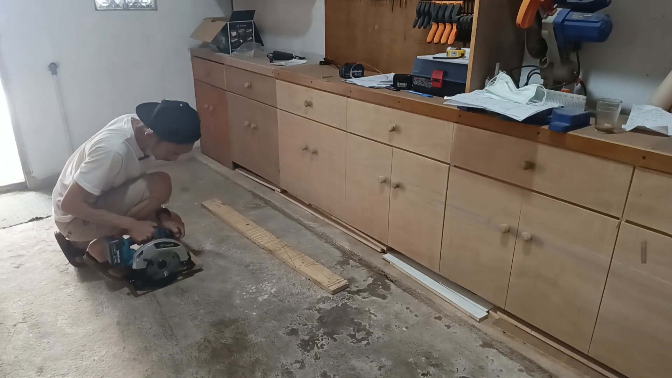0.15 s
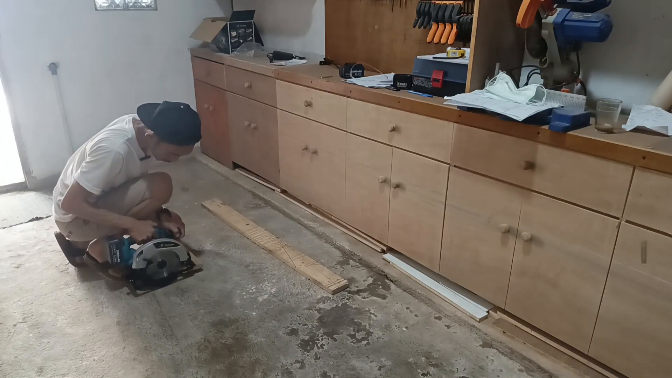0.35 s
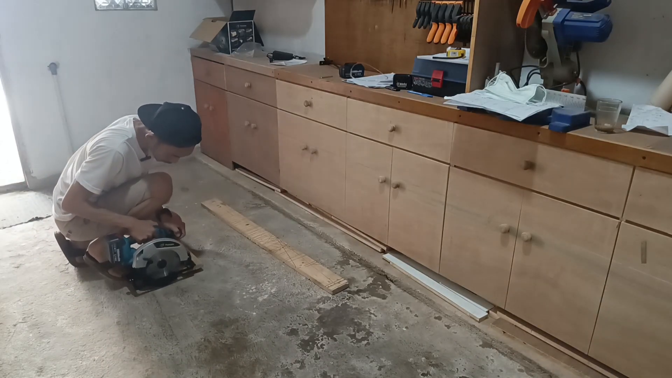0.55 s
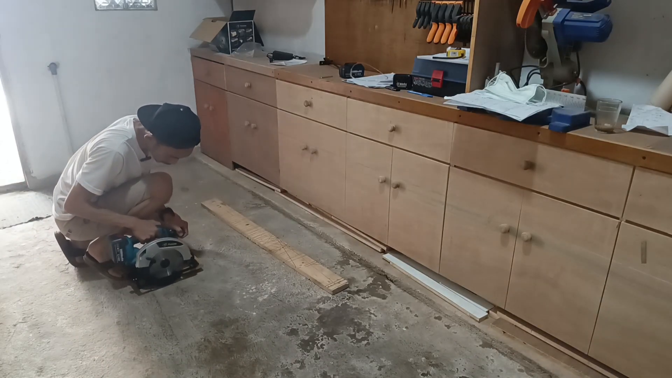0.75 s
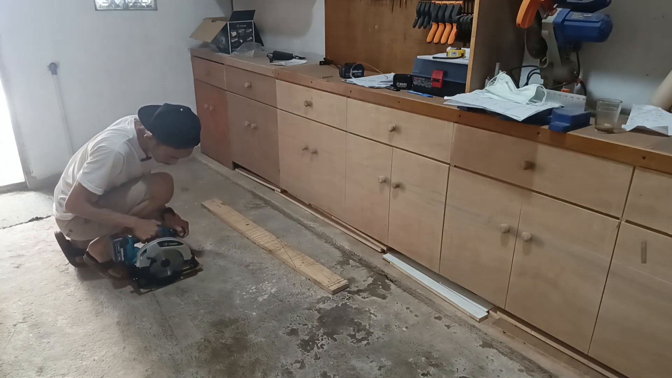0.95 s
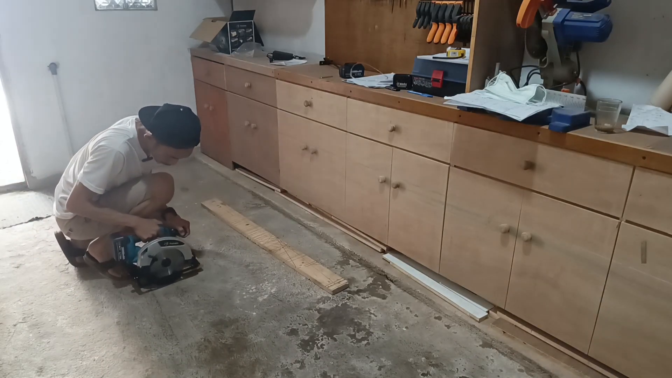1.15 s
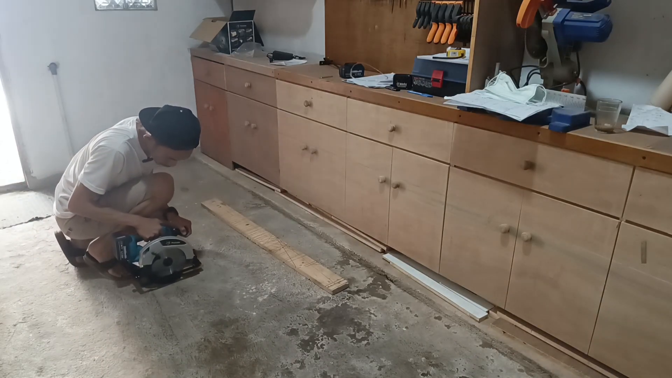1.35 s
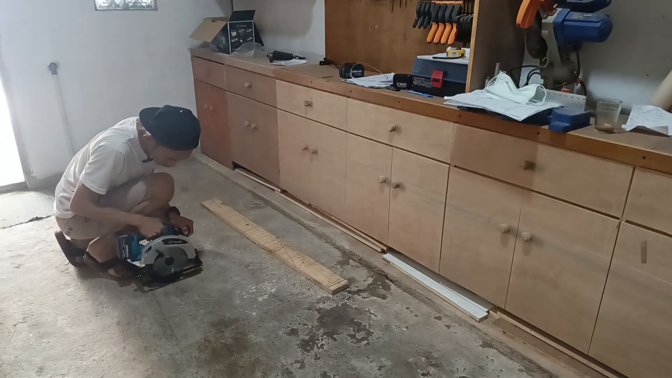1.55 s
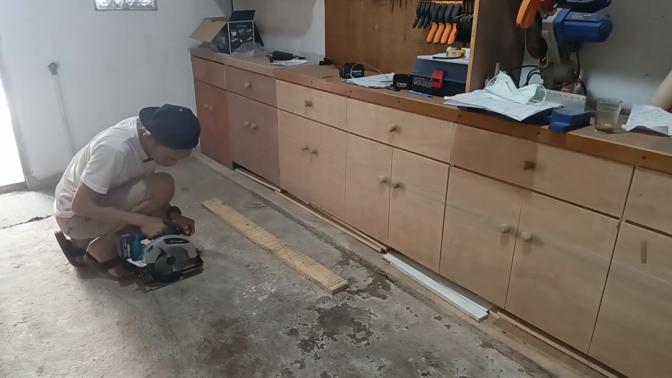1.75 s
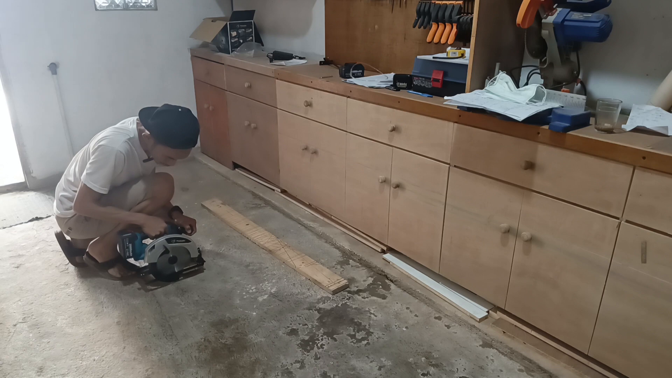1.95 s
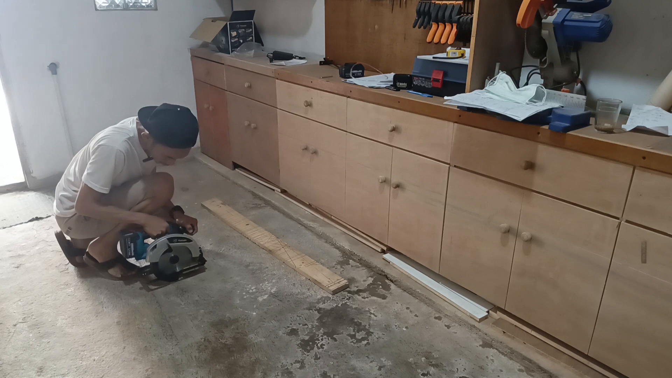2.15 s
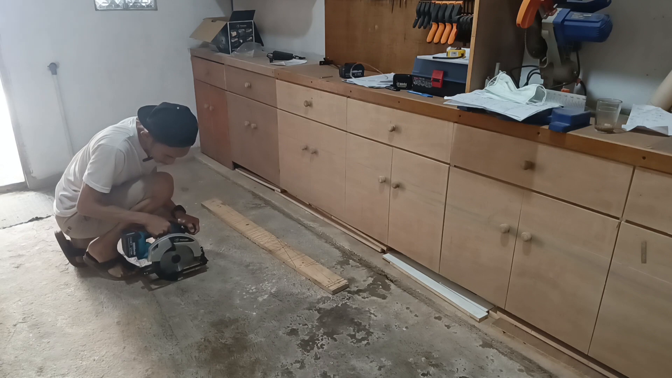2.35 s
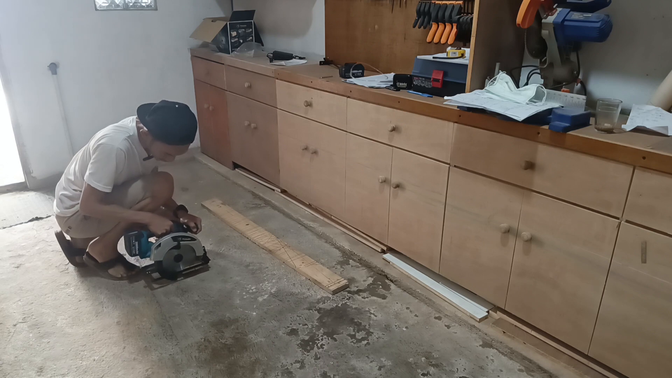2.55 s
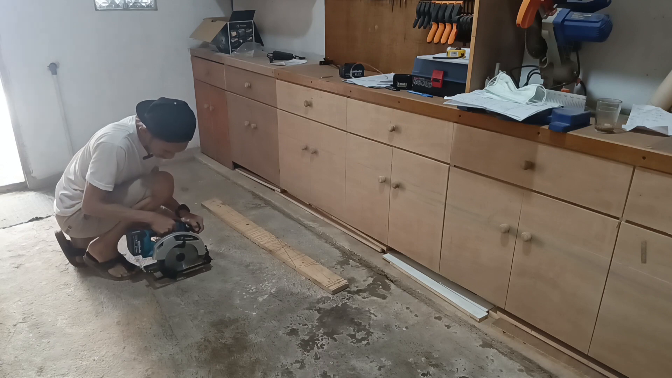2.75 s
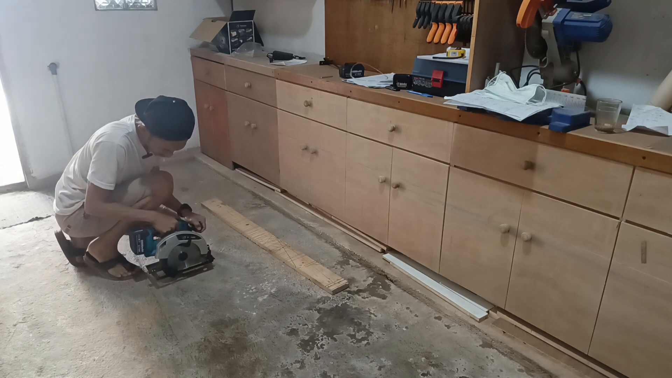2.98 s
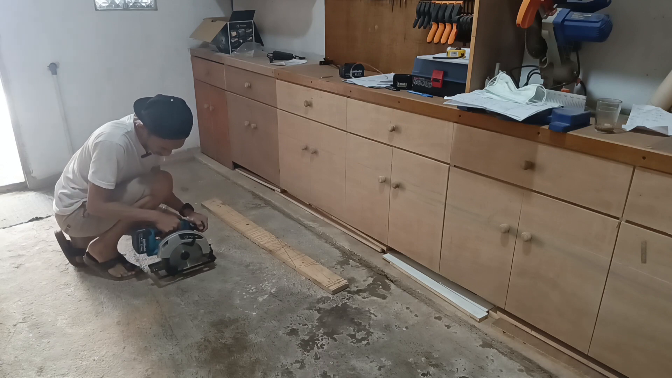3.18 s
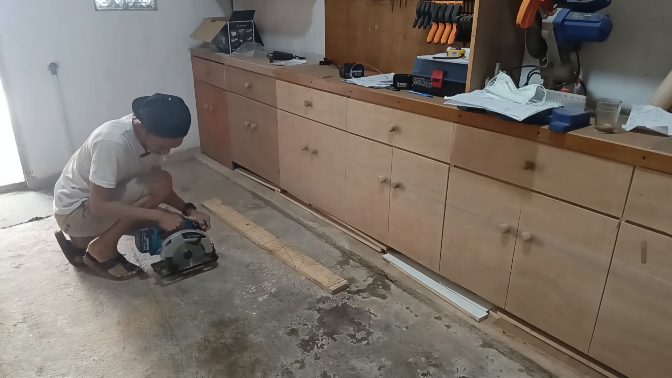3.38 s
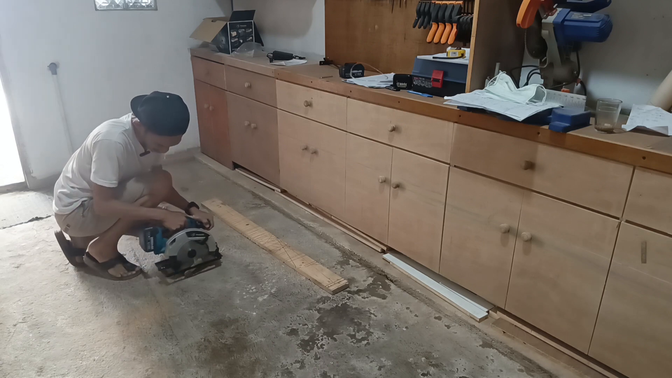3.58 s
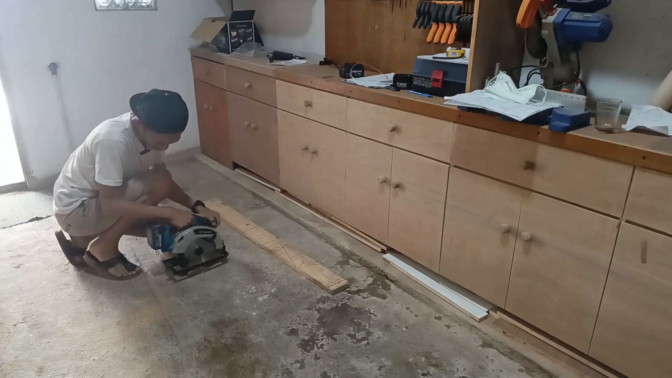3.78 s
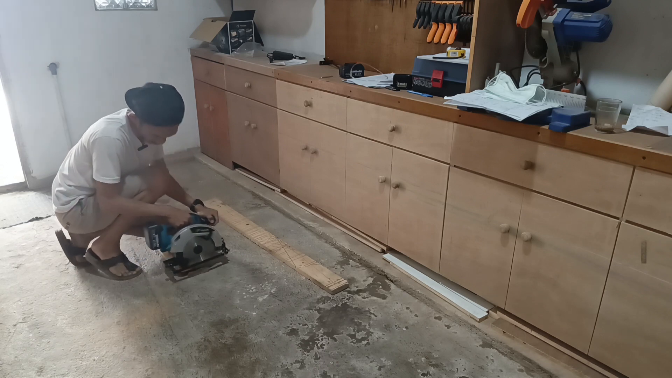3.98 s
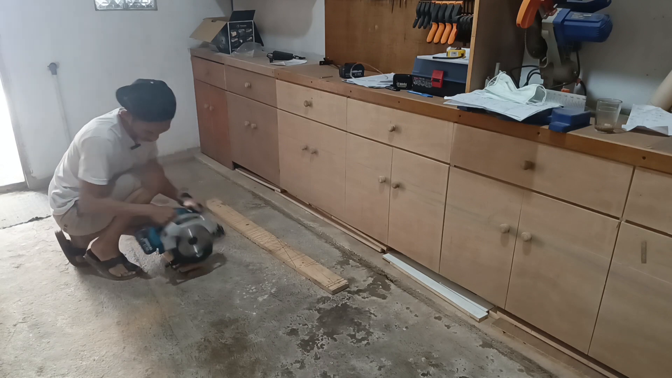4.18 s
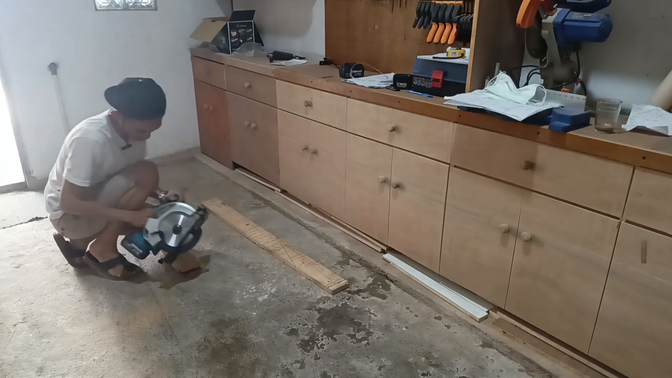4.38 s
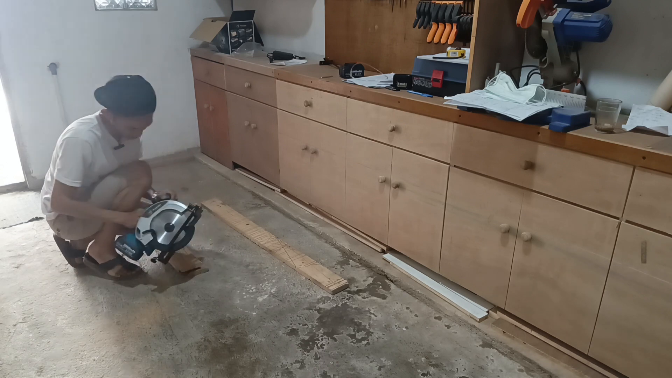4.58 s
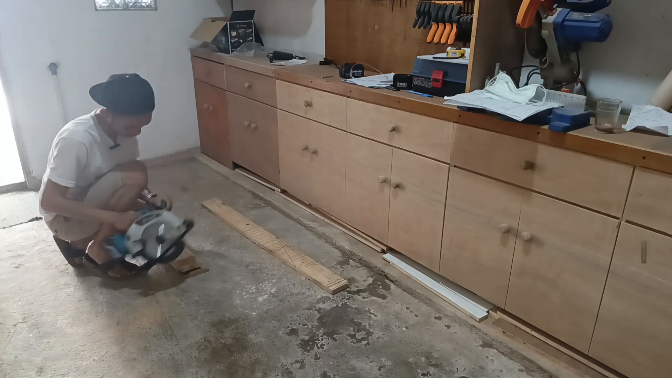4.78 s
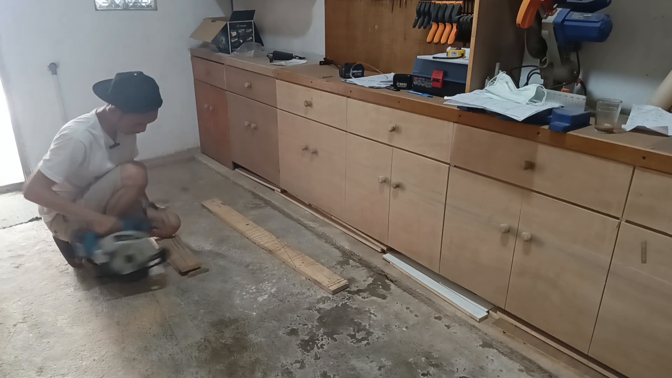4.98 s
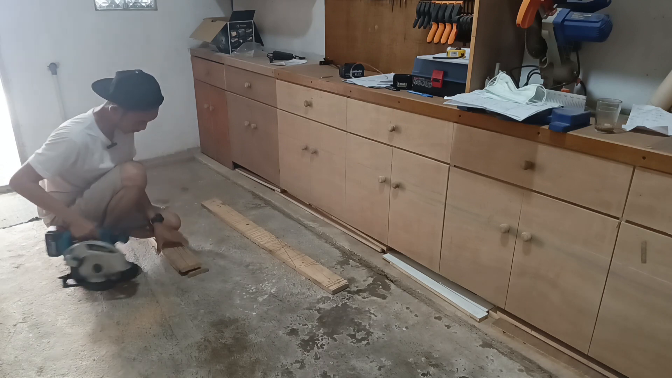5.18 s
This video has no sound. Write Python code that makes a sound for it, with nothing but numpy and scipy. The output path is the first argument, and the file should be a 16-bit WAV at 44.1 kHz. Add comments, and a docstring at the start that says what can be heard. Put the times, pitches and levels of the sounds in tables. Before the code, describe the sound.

A quiet workshop with a barely audible knock, then a sharp trigger click and a circular saw spinning up in half a second. The teeth bite with bright hiss and tearing, the pitch sagging under load, with howls and squeals near the end. The blade breaks free, power stops, and the gears rattle down past a dull guard clack. Close, clear, practically mono pickup with short hard-room reflections.

```python
"""A quiet workshop and a faint knock, then a trigger clicks and a cordless circular saw spins up. It rips
through a board and coasts down. The shaft speed drives gear whine, fan rush and the beat of the teeth. The cut
adds noise for hiss, tearing and splinters, and resonances for howls and zings. Squeals mark the blade rubbing,
and once in the run-down the slowing tooth tone sings through the blade's mode; ringing knocks the guard; slack
gears rattle beside the ringing blade."""
import sys
import numpy as np
from scipy import signal
from scipy.fft import rfft, irfft, next_fast_len
from scipy.io import wavfile
from scipy.ndimage import uniform_filter1d

SR = 44100
rng = np.random.default_rng(int(sys.argv[2]) if len(sys.argv) > 2 else 0)


def bounce(signal):
    """Save signal as a 16-bit WAV file at the path given by the first command-line argument."""
    frames = np.transpose(np.atleast_2d(signal))
    limited = np.clip(frames, -1, 1)
    pcm = np.round(limited * 32767).astype(np.int16)
    wavfile.write(sys.argv[1], SR, pcm)


N = 230731
T = np.arange(N) / SR  # time of every sample (s)

START, RELEASE = .426, 4.075  # trigger pulled and let go (s)
CUT_IN, CUT_OUT = .96, 3.77  # the teeth meet and leave the board (s)
PINION, TEETH_PER_TURN = 7, 4.41  # gear teeth and saw teeth passing per turn of the shaft
SPIN_UP_HZ_PER_S, FREE_HZ = 610, 314  # rise of the shaft speed, and its limit without load

# level of the whole gearbox: (start_s, level_db)
GEAR_LEVEL = [(.92, -1), (1.25, -7), (1.6, -8.5), (2.3, -11), (2.7, -27.5), (3.83, -13), (4.04, -16.5),
              (5.1, -23.5), (5.23, -27.5)]
# spectrum of the blade's draught: (pitch_hz, level_db)
DRAUGHT = [(12, -51), (20, 0), (70, 2.5), (403, -3), (467, -8), (500, -20.5), (650, -39), (1100, -120)]


def amp(db):
    """Turns decibels into a gain."""
    return 10 ** (np.asarray(db) / 20)


def evened(x):
    """Scales a sound to an rms of 1."""
    return x / np.sqrt(np.mean(x ** 2) + 1e-20)


def curve(rows):
    """Joins (s, value) points by straight lines."""
    return np.interp(T, *np.transpose(rows))


def between(start, end, rise, fall):
    """1 from start to end, with straight ramps after the start and after the end."""
    fade_in = np.clip((T - start) / rise, 0, 1)
    fade_out = np.clip(1 - (T - end) / fall, 0, 1)
    return fade_in * fade_out


def add(mix, s, sound):
    """Mixes a sound in at s seconds."""
    part = mix[round(s * SR):][:len(sound)]
    part += sound[:len(part)]


def noise():
    """White noise for the whole scene."""
    return rng.standard_normal(N)


def cycle(turns):
    """A sine wave that counts its position in whole turns."""
    return np.sin(2 * np.pi * turns)


def wander(hz):
    """Slow random drift with an rms of 1, mostly below the given rate."""
    size = next_fast_len(N, True)
    low_pass = 1 + (np.fft.rfftfreq(size, 1 / SR) / hz) ** 4
    return evened(irfft(rfft(noise(), size) / low_pass, size)[:N])


def colour(x, points):
    """Filters a sound to the given spectrum, without sounding ahead of its cause."""
    f, db = np.transpose(points)
    hz = abs(np.fft.fftfreq(4096, 1 / SR))
    level_db = np.interp(np.log(hz + 1), np.log(f + 1), db)
    log_gain = np.log(amp(np.maximum(level_db, -100)))
    # the Hilbert transform supplies the phase that makes the filter causal
    taps = np.fft.ifft(np.exp(np.conj(signal.hilbert(log_gain)))).real
    return signal.oaconvolve(x, taps[:len(taps) // 2])[:N]


def band(x, lo_hz, hi_hz):
    """Keeps the sound between two frequencies."""
    edges = [lo_hz, min(hi_hz, .49 * SR)]
    return signal.sosfilt(signal.butter(4, edges, "band", fs=SR, output="sos"), x)


def resonate(x, hz, width):
    """A resonance of gain 1 whose pitch can follow a curve."""
    turn = np.exp(2j * np.pi * np.cumsum(hz * np.ones(len(x))) / SR)
    r = np.exp(-np.pi * width / SR)
    # shift the pitch down to zero, smooth, then shift back up
    return 2 * (turn * signal.lfilter([1 - r], [1, -r], x / turn + 1e-18)).real


def twice_resonated(x, hz, width, second_width):
    """Two resonances in a row at the same pitch."""
    return resonate(resonate(x, hz, width), hz, second_width)


def ringing(x, modes):
    """Sum of fixed resonances, given as (pitch_hz, width_hz, level_db)."""
    return sum(amp(db) * signal.lfilter(*signal.iirpeak(min(hz, .49 * SR), hz / width, SR), x)
               for hz, width, db in modes)


def steadied(x, size=2205):
    """Holds the short-term level near 1, averaging twice over size samples."""
    power = uniform_filter1d(uniform_filter1d(x ** 2, size), size)
    return x / np.sqrt(abs(power) + 1e-14)


def room(x, wet_db=-7, t60=.26, dull_hz=9000):
    """Floor and cabinet reflections and the workshop's tail: sparse random echoes that die away."""
    t = np.arange(SR // 2) / SR
    signs = rng.choice([-1., 1.], len(t))
    sparse = rng.random(len(t)) < 2000 / SR  # about 2000 echoes per second
    taps = signs * sparse * amp(-60 * t / t60) * (t > .004)
    taps = signal.lfilter(*signal.butter(1, min(dull_hz, .45 * SR), fs=SR), taps)
    echoes = signal.oaconvolve(x, taps / np.linalg.norm(taps))[:N]
    return evened(x + amp(wet_db) * echoes) * np.std(x)


def workshop_tone():
    """The steady, quiet noise of the workshop: white noise shaped to the room's spectrum."""
    # spectrum of the quiet workshop: (pitch_hz, level_db)
    room_spectrum = [(15, -27), (25, 9), (27, -7), (146, -11), (326, -14), (363, -3), (501, -6), (573, -9),
                     (749, -11), (1150, -14), (2370, -25), (7280, -32.5), (11500, -33), (15000, -36)]
    tone_db = -73.5
    return amp(tone_db) * evened(colour(noise(), room_spectrum))


def shaft_speed():
    """Turns per second: an even rise that levels off, sag under load, then a free run-down."""
    # the wood holds the motor back: (start_s, lost_turns_per_s)
    sag = [(1.33, 0), (1.6, 22), (1.8, 27), (2.1, 29), (2.33, 34), (2.47, 25), (2.62, 33), (3.1, 40),
           (3.63, 49), (3.78, 27), (3.92, 13), (4.07, 9)]
    kick_hz, knee = 10, 8  # speed of the first jerk; sharpness of the levelling off
    coast_s = 1.13  # time for the free-wheeling speed to fall to 1/e
    ramp = kick_hz + SPIN_UP_HZ_PER_S * np.maximum(T - START, 0)
    driven = ramp / (1 + (ramp / FREE_HZ) ** knee) ** (1 / knee) - curve(sag)
    return driven * np.exp(-np.maximum(T - RELEASE, 0) / coast_s)


def puffs():
    """The blade's draught puffs out of the kerf: short low gusts of shaped noise."""
    # gusts: (start_s, end_s, level_db)
    gusts = [(2.87, 2.92, -46), (3.37, 3.5, -48.5)]
    swells = sum(amp(db) * between(start, end, .04, .05) for start, end, db in gusts)
    return swells * evened(colour(noise(), DRAUGHT))


def knocks(tick_db=2):
    """Blows of trigger, motor and guard: each a brief noise tick and the guard's decaying modes."""
    # blows: (start_s, level_db, brightness_db per tenfold pitch)
    blows = [(.228, -60, -1), (0.423, -46, 12), (.438, -19.5, 4), (4.365, -27.5, -23),
             (4.379, -13.5, -10.5), (4.452, -25, -14), (4.465, -17.5, -5), (4.476, -31, -13)]
    # what the guard rings with: (pitch_hz, level_db, fade_by_60_db_s)
    guard_modes = [(605, -14, 0.043), (752, -7.5, 0.049), (812, 2, 0.04), (920, -14.5, 0.095),
                   (1200, -26, 0.054), (1770, -17, .05), (2500, -14, 0.023), (3164, -8.5, 0.046),
                   (3410, -3, 0.027), (4200, -11, 0.034)]
    out, t = np.zeros(N), np.arange(SR // 4) / SR
    for s, db, bright_db in blows:
        ring = sum(amp(level + bright_db * np.log10(hz / 1500) - 60 * t / t60) * cycle(hz * t)
                   for hz, level, t60 in guard_modes)
        burst = rng.standard_normal(len(t)) * np.exp(-t / 0.00039)
        tick = amp(tick_db + bright_db / 2) * band(burst, 710, 4900)
        add(out, s, amp(db) * (ring * (1 - np.exp(-t / 0.0034)) + tick))
    return room(out, wet_db=-5.5, t60=0.48)


def rubs():
    """The blade rubs the kerf or the guard, and once in the run-down the slowing tooth tone sweeps through the
    blade's mode near 780 Hz: short squeals, each a gliding, unsteady sine."""
    # squeals, the one at 4.665 s being the tooth tone crossing the blade's mode: (start_s, length_s, level_db,
    # first_pitch_hz, last_pitch_hz, width_hz)
    squeals = [(3.624, 0.046, -17, 1302, 1310, 63), (3.657, 0.066, -28, 1144, 872, 67),
               (3.718, 0.045, -17.5, 1370, 1317, 85), (4.452, 0.043, -40.5, 3040, 2970, 36),
               (4.161, 0.067, -31.5, 1130, 1080, 38), (4.665, 0.044, -31.5, 804, 768, 27),
               (5.064, 0.059, -37, 832, 750, 30), (5.137, 0.066, -41.5, 1403, 1325, 72)]
    out = np.zeros(N)
    for s, length, db, first_hz, last_hz, width in squeals:
        hz = np.linspace(first_hz, last_hz, int(length * SR))
        drift = width / 2 * wander(144)[:len(hz)]
        tone = np.sqrt(2) * cycle(np.cumsum(hz + drift) / SR)
        add(out, s, amp(db) * tone * signal.windows.tukey(len(hz), .6))
    return room(out, wet_db=-3.5, t60=0.12)


def blade(ring_db=0, width=14):
    """The steel disc rings in its own modes once it spins free: narrow bands of noise."""
    # the free blade: (pitch_hz, level_db)
    disc_modes = [(780.6, -49), (1222, -50.5), (1744, -60.5), (2250, -63.5), (3548, -69), (5383, -64),
                  (6901, -64), (7241, -69), (9631, -77), (10067, -76)]
    ring = sum(amp(db) * steadied(twice_resonated(noise(), hz, width + hz / 150, 4 * width), size=6000)
               for hz, db in disc_modes)
    return amp(ring_db) * ring * between(4.31, 5.3, 0.23, .1)


def breakout(scrape_db=-29):
    """The blade scrapes roughly over the last of the cut: noise through a few resonances."""
    # resonances of the scrape: (pitch_hz, width_hz, level_db)
    scrape_modes = [(1380, 300, -2.2), (1770, 230, -0.55), (2390, 110, 1)]
    length_s = .15
    scrape = steadied(band(ringing(noise(), scrape_modes), 1070, 2700))
    return amp(scrape_db) * scrape * between(CUT_OUT - length_s, CUT_OUT - .02, 0.034, 0.024)


def zings(depth, zing_db=-1, swell_db=3):
    """The kerf grips the buried blade: friction noise swells in its resonances, with a few strong grips."""
    # resonances that swell and fade by chance: (pitch_hz, width_hz, level_db)
    swelling_modes = [(1933, 84, -48), (4540, 700, -39), (6860, 280, -34.5), (7290, 270, -41),
                      (9700, 490, -42), (14400, 700, -49)]
    # strong grips: (start_s, end_s, level_db, pitch_hz, width_hz)
    grips = [(1.306, 1.78, -29, 8330, 260), (2.103, 2.896, -35.5, 1895, 159), (2.363, 2.61, -27, 3350, 200),
             (2.843, 3.125, -34, 7400, 300), (2.89, 2.975, -31.5, 4190, 110),
             (2.929, 3.017, -30, 3410, 120), (3.152, 3.45, -28, 3710, 280),
             (3.199, 3.613, -28.5, 6800, 380), (3.364, 3.586, -28.5, 12300, 800)]
    swell_rate_hz = 4
    out = sum(amp(db + swell_db * wander(swell_rate_hz))
              * evened(twice_resonated(noise(), hz, width, 2 * width))
              for hz, width, db in swelling_modes)
    out = out * depth * between(CUT_IN, CUT_OUT, 0.11, 0.038)
    for start, end, db, hz, width in grips:
        size = max(int((end - start) * SR), 256)
        ring = evened(twice_resonated(noise()[:size], hz, width, 2 * width))
        add(out, start, amp(db + zing_db) * ring * signal.windows.tukey(size, .6))
    return out


def howling():
    """The board's own resonance: narrow noise that swells up and breaks off."""
    # swells: (start_s, end_s, level_db at the end)
    swell_rows = [(2.696, 3.22, -28.5), (3.334, 3.603, -22)]
    growth_db_per_s = 20
    swells = sum(amp(db + growth_db_per_s * np.minimum(T - end, 0)) * between(start, end, 0.054, 0.054)
                 for start, end, db in swell_rows)
    return swells * steadied(resonate(resonate(noise(), 1324, 100), 1260, 160))


def motor(turns, hum_db=-63, whistle_db=-43, whistle_hz=10070, whistle_fall_hz_per_s=2400):
    """Hum of the rotor's unbalance, the straining pinion, and a thin falling whistle at switch-on."""
    # resonances that the pinion's tone sweeps through: (pitch_hz, width_hz, level_db)
    pinion_modes = [(773, 57, -17.5), (1220, 139, -12), (2300, 460, -35)]
    hum = amp(hum_db + 1.0 * wander(20)) * cycle(turns) * between(1.0, RELEASE, 0.38, 0.47)
    strain = amp(curve(GEAR_LEVEL) + 2 * wander(75)) * ringing(cycle(PINION * turns), pinion_modes)
    strain = strain * between(.48, 4.2, 0.018, 0.039)
    falling_hz = whistle_hz - whistle_fall_hz_per_s * np.clip(T - START, 0, 1)
    whistle = amp(whistle_db) * steadied(twice_resonated(noise(), falling_hz, 200, 400))
    return hum + strain + whistle * between(START, 0.68, 0.045, .06)


def singing(turns, depth, flutter_db=1.17, muffled_db=-14, pressed_db=5, waver=0.014,
            whine_db=2, whine_follows=0.39):
    """Tones of motor and teeth swell as they cross a resonance; deep in the wood the teeth take over."""
    # resonances that each tone sweeps through: (pitch_hz, width_hz, level_db)
    shaft_modes, tooth_modes = [(1128.4, 48, -19.5)], [(1233, 32, -26.5)]
    shaky = turns + waver * wander(29)
    whine = ringing(cycle(4 * shaky), shaft_modes)
    teeth = ringing(cycle(TEETH_PER_TURN * shaky), tooth_modes)
    whine_level = whine_db + whine_follows * curve(GEAR_LEVEL) + muffled_db * depth
    whine = whine * amp(whine_level + flutter_db * wander(35))
    teeth = teeth * amp(pressed_db * depth + flutter_db * wander(47))
    return whine * between(0.78, 4.25, 0.035, 0.078) + teeth * between(1.2, 3.15, 0.11, 0.035)


def backlash(rate=56, unevenness=.22, spread_db=3.0, decay=0.0061, rest=0.17):
    """Slack gear teeth slap about rate times a second: the envelope of a train of brief bursts."""
    gaps, sizes = rng.standard_normal((600, 2)).T
    at = (np.cumsum(np.exp(unevenness * gaps)) / rate * SR).astype(int)
    inside = at < N
    slaps = np.zeros(N)
    slaps[at[inside]] = amp(spread_db * np.clip(sizes[inside], -1.5, 1.5))
    return evened(rest + signal.lfilter([1], [1, -np.exp(-1 / (decay * SR))], slaps))


def gearbox(speed, turns, jitter=.013, rush_db=4, case_db=-3, mesh_db=-4.5, shaft_db=-5, chatter_db=1,
            torque_db=9, taut_rattle=0.21, slack_rattle=0.78, loosening=1.9):
    """Shaft tones, fan rush and gear rattle sound through the housing, which gets brighter with speed."""
    # tones of the shaft: (multiple_of_shaft_speed, level_db)
    orders = [(2, -6.5), (4, -11.5), (6, -7.5), (7, 1), (11, -3), (14, 5.5), (16, 1.5), (20, -1.5), (21, 6)]
    # overtones of the meshing gears: (multiple_of_mesh_rate, level_db)
    mesh_overtones = [(4, 12.5), (5, 15), (6, 10), (7, 12.5), (8, 9.5), (9, 12), (10, 6), (11, -6),
                      (12, -28), (14, -6)]
    # resonances of the housing: (pitch_hz, width_hz, level_db)
    case_modes = [(735, 60, -56), (1153, 61, -2.5), (1244, 57, -6.5), (1743, 30, 7.5), (2230, 220, -4),
                  (3590, 130, 1.5), (4115, 150, 3), (5340, 74, 1.5), (6840, 190, -2.5), (8200, 120, 2.5),
                  (10550, 410, -3.5)]
    # spectra of the running gears and of the rattle: (pitch_hz, level_db)
    housing, rattle_spectrum = [(71, -51), (120, -36.5), (367, -24.5), (469, -10), (748, -3), (955, -9),
                                (1240, -4.5), (1650, -9.5), (1790, -15.5), (2700, -19.5), (3440, -16),
                                (5720, -25), (7010, -15.5), (10500, -16), (15500, -17)], [(120, -68), (200, -38), (653, -10.5), (728, -10.5),
                                                 (783, -12.5), (1010, -10.5), (1190, -3), (1350, -14.5),
                                                 (2210, -20), (3890, -26.5), (5300, -22.5), (10000, -11.5),
                                                 (15500, -29)]
    # growl, whirr and sizzle: (low_hz, high_hz, level_db at free speed, speed_db per tenfold speed,
    # coast_db gained when coasting, delay_s after the trigger)
    gear_bands = [(112, 2390, -23, 2.5, 0.5, 0.0123), (2510, 5170, -25, 10, -1, 0),
                  (5040, 14600, -20, 25, 1.5, 0.0056)]

    shaky = turns + jitter * wander(90)  # play in the gears smears the high orders
    tones = sum(amp(db + 4.5 * wander(21.5)) * np.cos(2 * np.pi * (round(k) * shaky + rng.random()))
                for k, db in orders)
    rush = noise() * (1 + 0.26 * np.cos(2 * np.pi * PINION * shaky)) * amp(2.1 * wander(60))
    mesh = sum(amp(db + 2 * wander(90)) * np.cos(2 * np.pi * (round(k) * PINION * shaky + rng.random()))
               for k, db in mesh_overtones)
    # with the power off the teeth chatter: broad bands that fall with the mesh overtones
    chatter = evened(sum(amp(db) * wander(450) * np.cos(2 * np.pi * round(k) * PINION * turns)
                         for k, db in mesh_overtones[:3]))
    chatter = amp(chatter_db) * chatter * between(RELEASE, 4.16, 0.0087, 0.58)

    # a change of speed loads the gears
    pulling = torque_db * abs(np.gradient(speed, T)) / SPIN_UP_HZ_PER_S
    drive = amp(pulling + shaft_db) * evened(tones) + amp(pulling + mesh_db) * evened(mesh)
    drive = drive + amp(rush_db) * (rush + chatter)
    running = evened(colour(amp(case_db) * drive + ringing(drive, case_modes), housing))

    slaps = backlash() * (noise() + 0.32 * chatter)
    rattle = evened(colour(slaps + .5 * ringing(slaps, case_modes), rattle_spectrum))
    coasting = np.clip((T - RELEASE) / 0.0088, 0, 1)
    slack = taut_rattle + coasting * slack_rattle * (FREE_HZ / speed) ** loosening  # the slower, the looser
    sound = room(steadied(running) + slack * rattle, wet_db=-9.5, t60=0.34)

    level = curve(GEAR_LEVEL)
    decades = np.log10(np.maximum(speed, 28) / FREE_HZ)  # speed in powers of ten
    out = np.zeros(N)
    for lo, hi, db, speed_db, coast_db, delay in gear_bands:
        gain = amp(level + db + speed_db * decades + coast_db * coasting)
        out += gain * steadied(band(sound, lo, hi)) * np.clip((T - START - delay) / 0.0038, 0, 1)
    return out


def cutting(turns, depth, bite=0.14, splinters_per_s=2500, splinter_db=-8, wobble_db=1.0, modes_db=-1,
            hiss_db=-1, tear_db=-23.0, tear_follows=0.64, smother_db=-7, draught_db=-44.5, draught_depth=.19):
    """Teeth tear fibres: pulsing noise whose hiss, tearing and draught follow the feed and change with depth."""
    # how hard the saw is fed, as the level of the hiss: (start_s, level_db)
    feed_level = [(0.98, -21), (1.14, -21.5), (1.21, -32.5), (1.32, -25), (1.33, -19), (1.52, -16.5),
                  (2.22, -15.5), (2.44, -18), (2.59, -16.5), (3.04, -25), (3.45, -28), (3.47, -26),
                  (3.74, -27), (3.8, -36)]
    full_feed_db = -16.5
    # level of the tearing, which thins out now and then deep in the cut: (start_s, level_db)
    tearing_level = [(2.3, 1), (2.5, 1.5), (2.7, -3), (2.96, 3), (3.04, 2.5), (3.19, 5), (3.26, -2.5),
                     (3.35, 5)]
    # resonances of the cut: (pitch_hz, width_hz, level_db)
    cut_modes = [(485, 7.3, 5.5), (3060, 38, 0), (3376, 24, 4), (3416, 43, 4.5), (3827, 19, 11.5),
                 (4210, 55, -0.5), (6660, 64.8, -23), (7000, 13, -56), (7670, 110, 1), (9130, 23, -3),
                 (10400, 67, -1), (11240, 98, -2.5), (14200, 90, 4)]
    # spectra with the blade shallow and buried: (pitch_hz, level_db)
    open_cut, deep_cut = [(180, -28.5), (300, -22.5), (484, -13.5), (535, -30), (674, -11.5), (769, -22),
                          (1050, -5), (1140, -1.5), (2320, -18), (3450, -7), (5760, -12), (6570, -7),
                          (10800, 2.5), (14300, -0.5), (15500, -5.5)], [(180, -41), (300, -21), (581, -38), (968, -23), (1220, 1.5),
                                            (1780, -21.5), (2690, -14.5), (3690, -14.5), (4000, -20.5),
                                            (5660, -16), (6790, -8.5), (7880, -14.5), (9450, -6.5),
                                            (14000, -10.5), (15500, -11)]

    strokes = 1 + bite * np.cos(2 * np.pi * TEETH_PER_TURN * turns)
    splinters = (rng.random(N) < splinters_per_s / SR) * np.sign(noise()) * amp(3.4 * rng.random(N))
    tear = (noise() + amp(splinter_db) * evened(splinters)) * strokes * amp(wobble_db * wander(46))
    tear = room(tear + amp(modes_db) * ringing(tear, cut_modes), wet_db=-5.5, t60=0.21)
    sound = (1 - depth) * evened(colour(tear, open_cut)) + depth * evened(colour(tear, deep_cut))
    sound = sound - 0.37 * ringing(sound, [(1130, 560, 0)])  # the teeth's own band is mostly clean tone

    feed = curve(feed_level)
    push = feed - full_feed_db
    body = band(sound, 257, 5370)
    upper = band(sound, 1170, 5270)
    steady_body = body / np.sqrt(uniform_filter1d(upper ** 2, size=6000))
    tearing = amp(tear_db + curve(tearing_level) + tear_follows * push + smother_db * depth) * steady_body
    hiss = amp(feed + hiss_db) * steadied(band(sound, 5720, 18000))
    draught = amp(draught_db + push + 1.3 * wander(8.2)) * np.minimum(depth / draught_depth, 1)
    draught = draught * evened(colour(noise(), DRAUGHT))
    return (hiss + tearing + draught) * between(CUT_IN, CUT_OUT, 0.011, 0.071)


def scene():
    """Shaft speed and depth of cut drive the saw; the quiet workshop lies under it."""
    # how far the blade is buried in the board: (start_s, buried_0_to_1)
    buried = [(1.3, 0), (1.55, .18), (2.52, 0.18), (2.66, 0.56), (3.12, 0.91), (3.5, 0.25), (3.76, 0.66),
              (3.9, 0.05)]
    speed, depth = shaft_speed(), np.clip(curve(buried), 0, 1)
    turns = np.cumsum(speed) / SR
    saw = gearbox(speed, turns) + motor(turns) + singing(turns, depth) + blade() + knocks()
    wood = cutting(turns, depth) + howling() + zings(depth) + breakout() + rubs() + puffs()
    mono = workshop_tone() + saw + wood
    return np.array([mono, mono])


def record(dry, side_db=-21):
    """Adds slight width in the top treble, rounds off high peaks, then cuts the treble and most of that width."""
    edge_hz = 15680
    side = amp(side_db) * band(np.roll(dry[0], 37), 16000, 19800)
    wide = dry + np.array([side, -side])
    rounded = wide / (1 + (wide / .7) ** 6) ** (1 / 6)
    low_pass = signal.firwin(511, edge_hz, window=("kaiser", 9), fs=SR)
    return signal.oaconvolve(rounded, low_pass[None], "same")


dry = scene()
out = record(dry)
bounce(out)
```